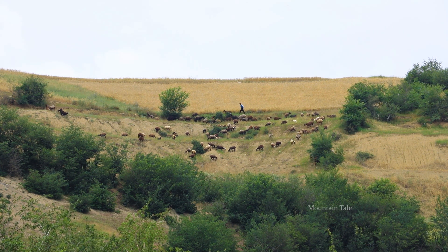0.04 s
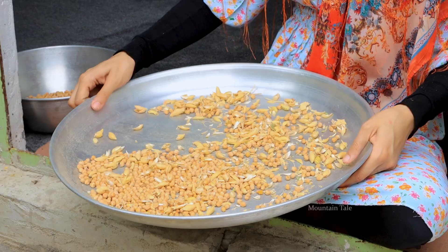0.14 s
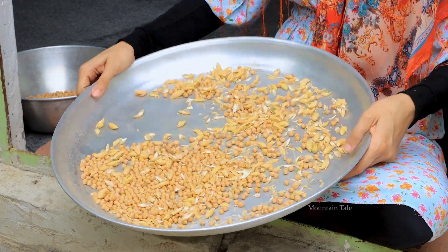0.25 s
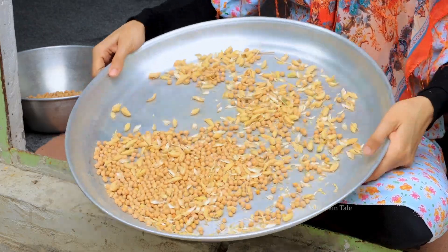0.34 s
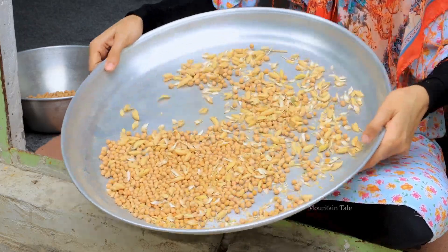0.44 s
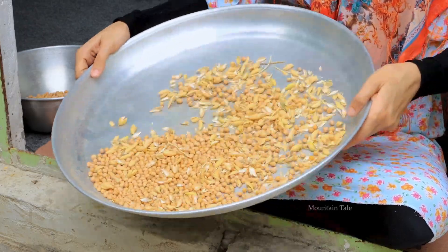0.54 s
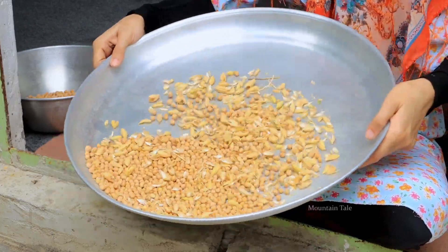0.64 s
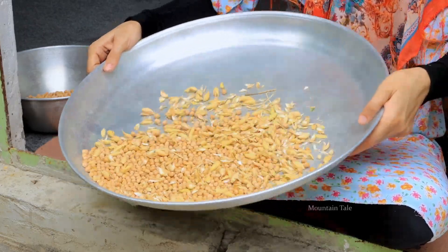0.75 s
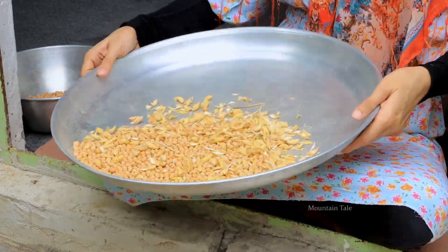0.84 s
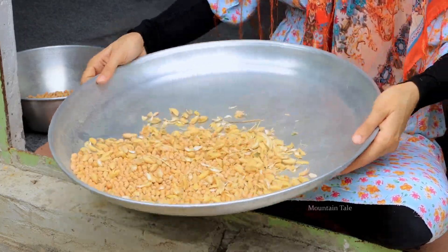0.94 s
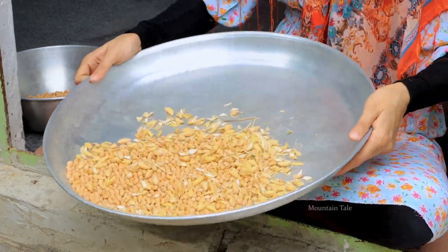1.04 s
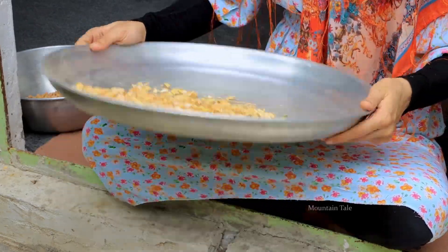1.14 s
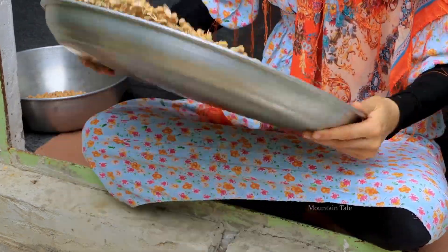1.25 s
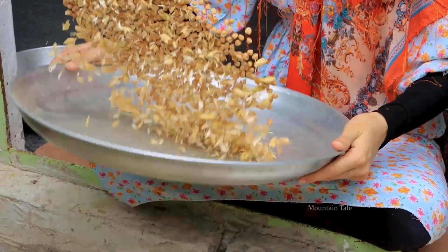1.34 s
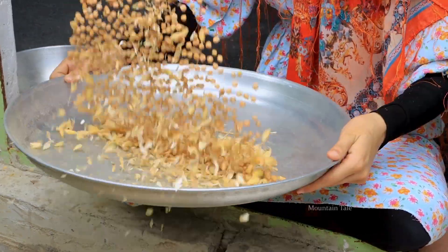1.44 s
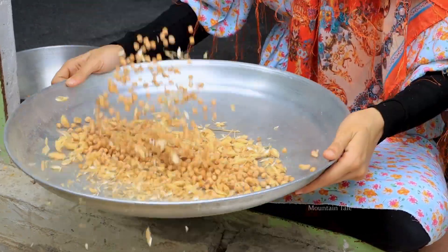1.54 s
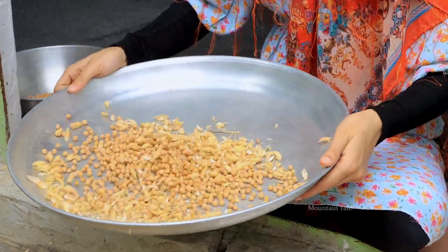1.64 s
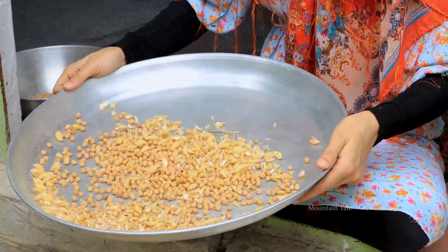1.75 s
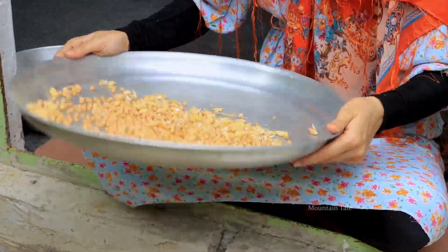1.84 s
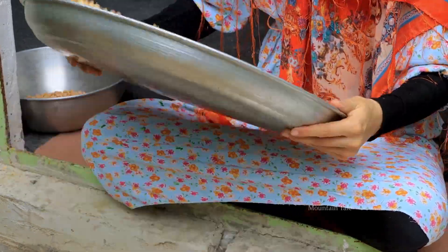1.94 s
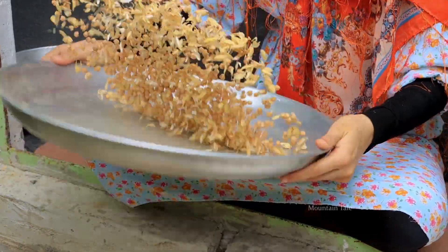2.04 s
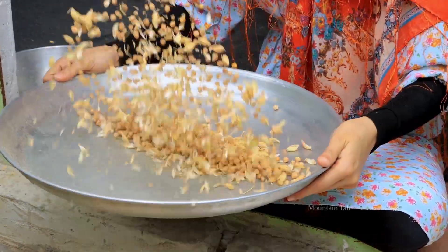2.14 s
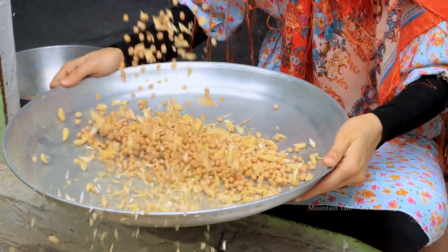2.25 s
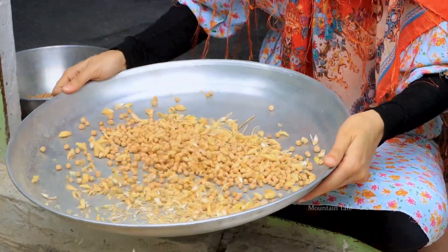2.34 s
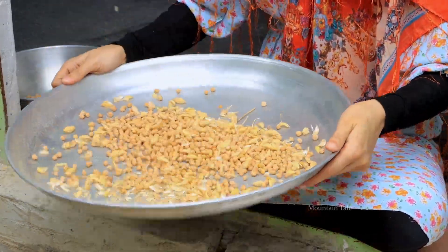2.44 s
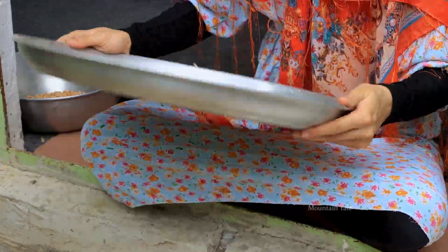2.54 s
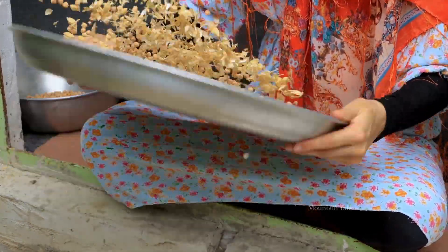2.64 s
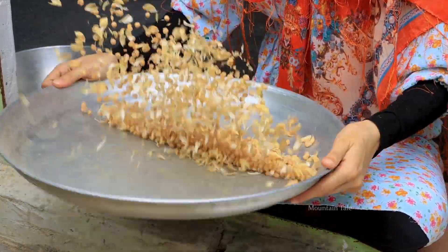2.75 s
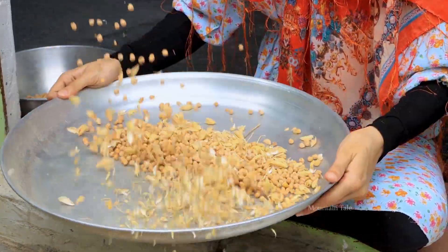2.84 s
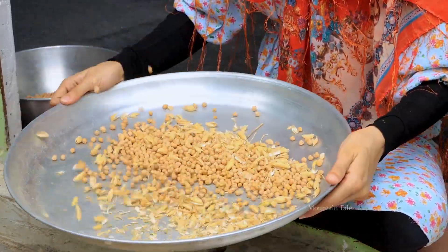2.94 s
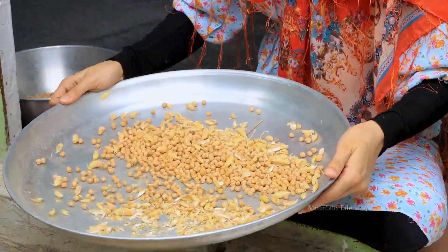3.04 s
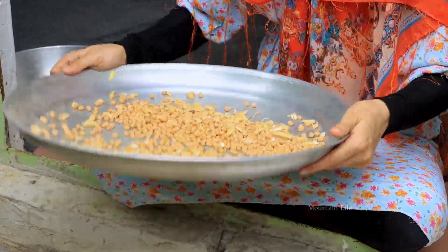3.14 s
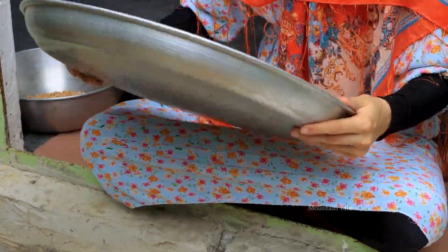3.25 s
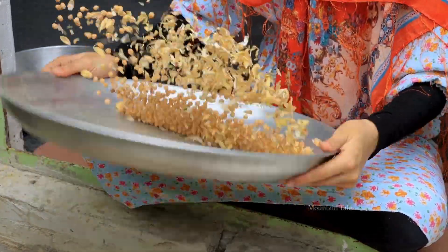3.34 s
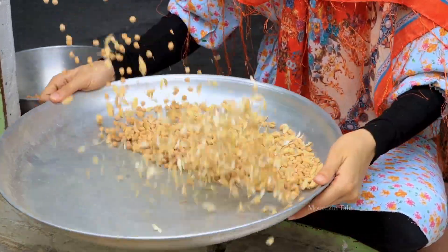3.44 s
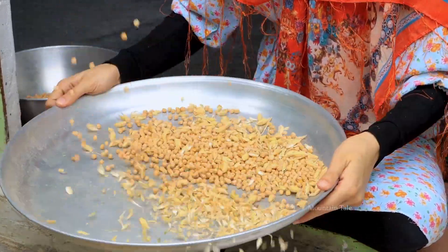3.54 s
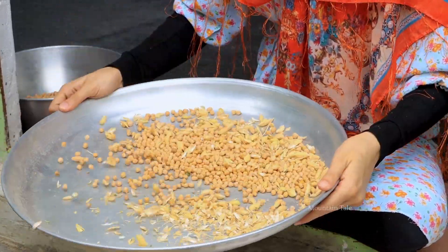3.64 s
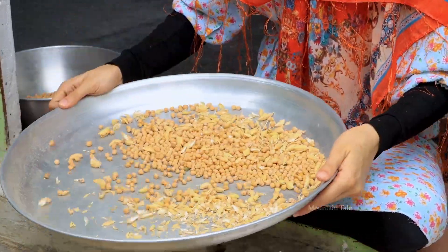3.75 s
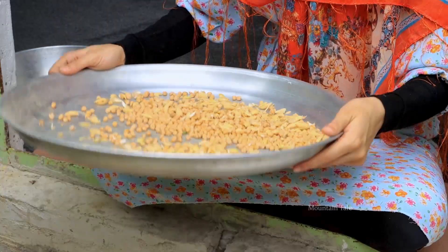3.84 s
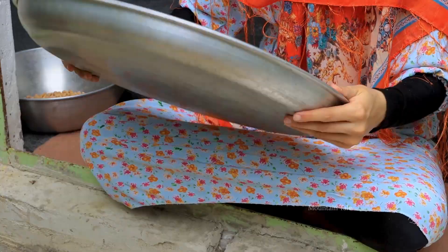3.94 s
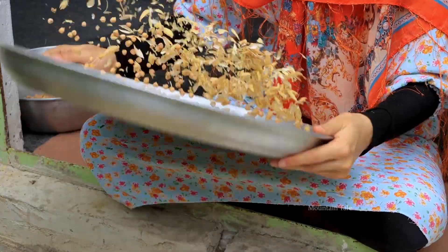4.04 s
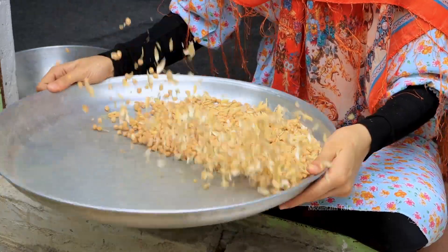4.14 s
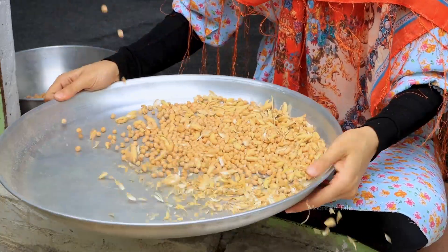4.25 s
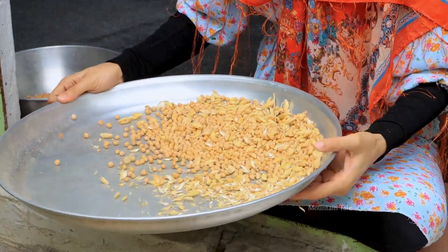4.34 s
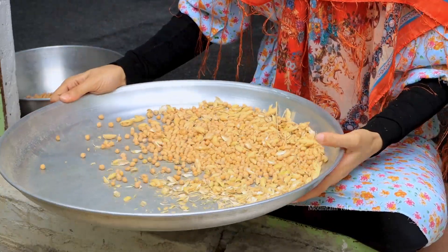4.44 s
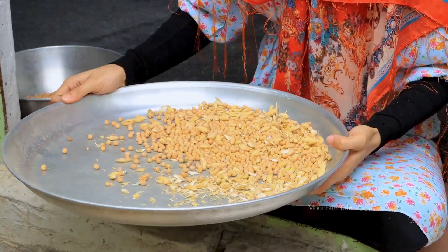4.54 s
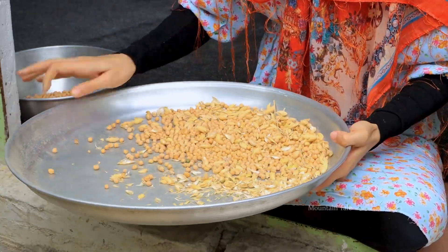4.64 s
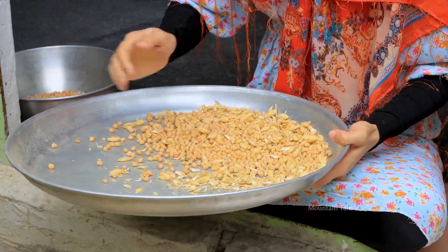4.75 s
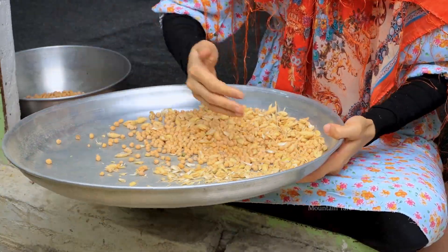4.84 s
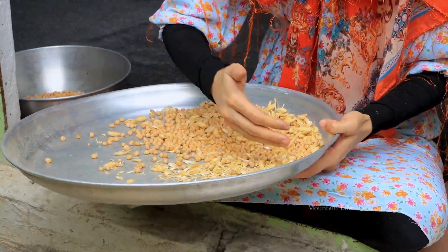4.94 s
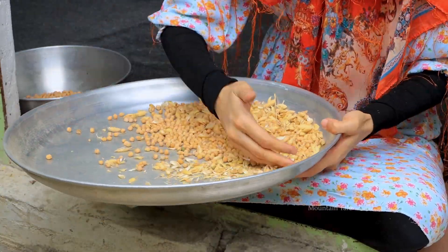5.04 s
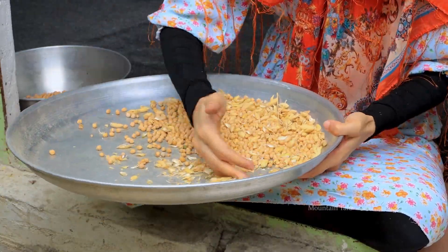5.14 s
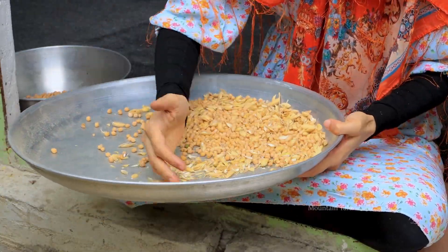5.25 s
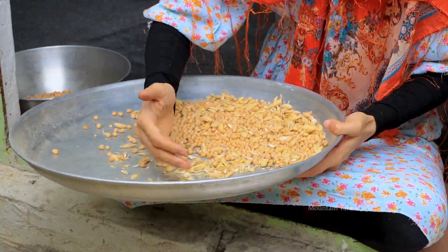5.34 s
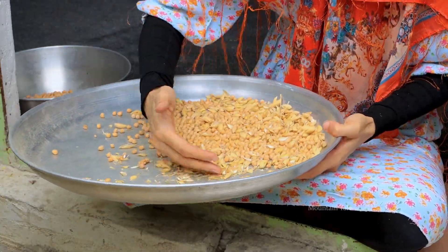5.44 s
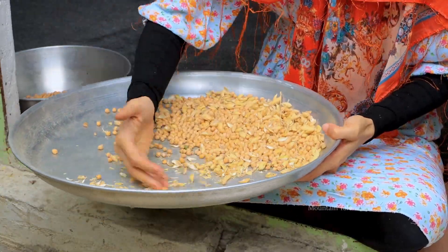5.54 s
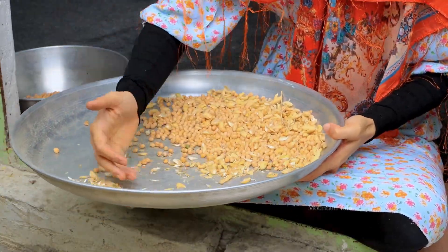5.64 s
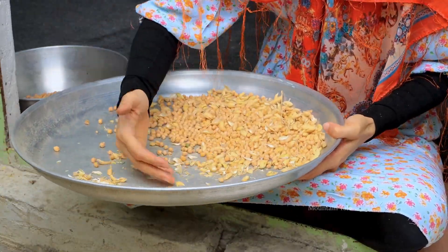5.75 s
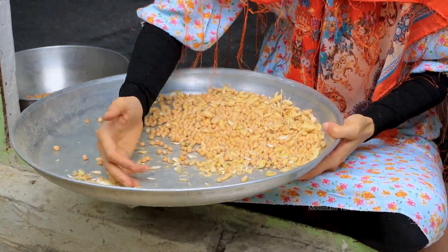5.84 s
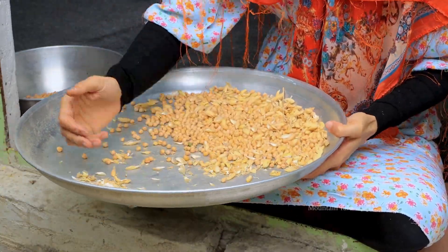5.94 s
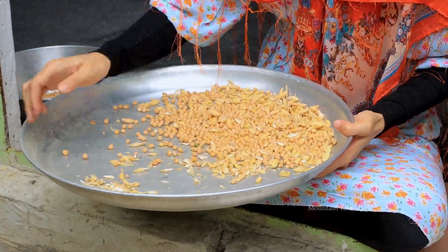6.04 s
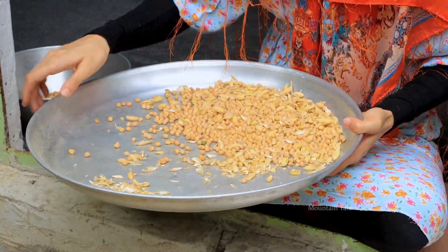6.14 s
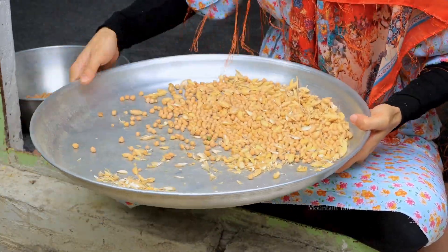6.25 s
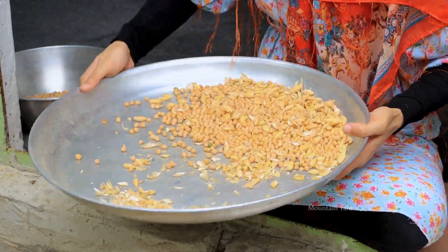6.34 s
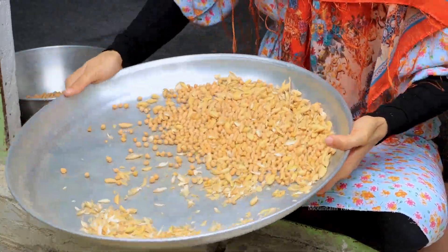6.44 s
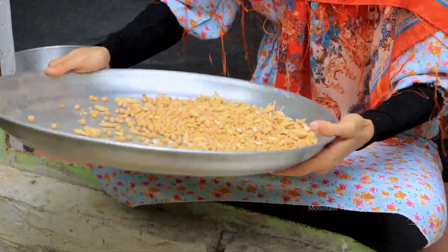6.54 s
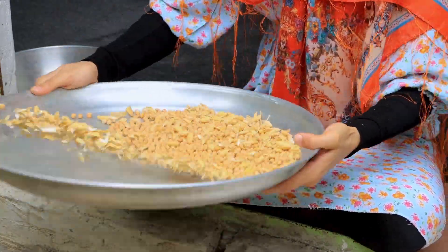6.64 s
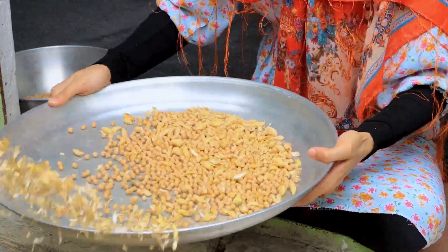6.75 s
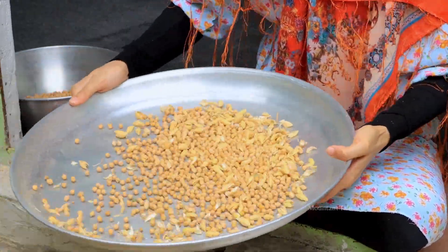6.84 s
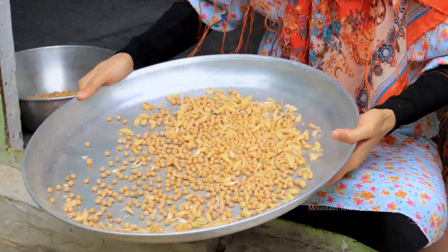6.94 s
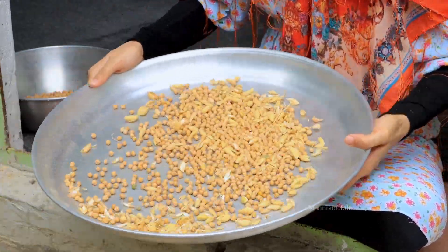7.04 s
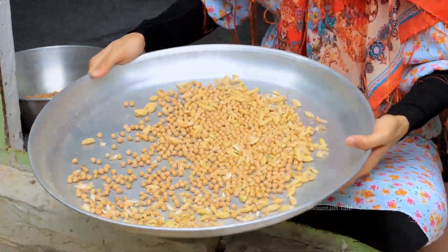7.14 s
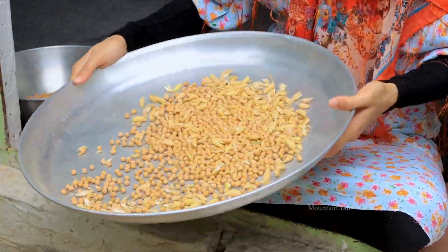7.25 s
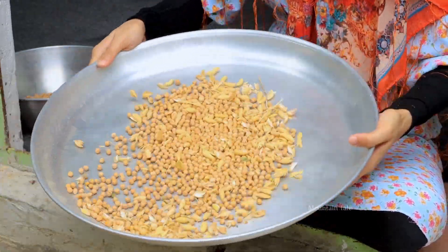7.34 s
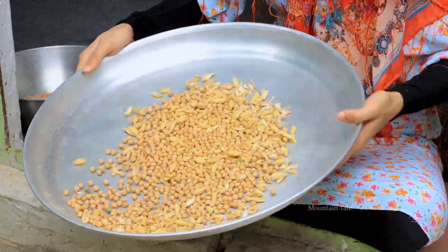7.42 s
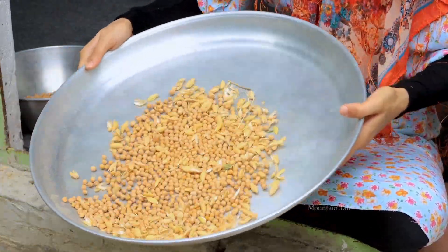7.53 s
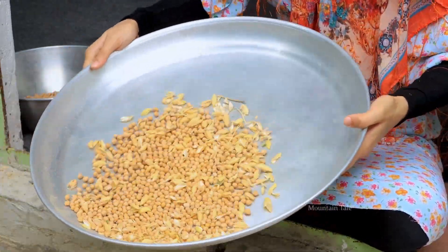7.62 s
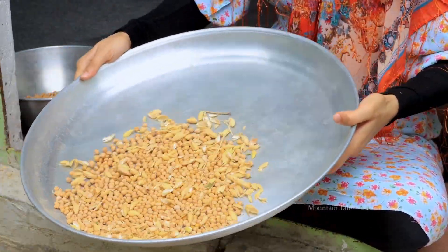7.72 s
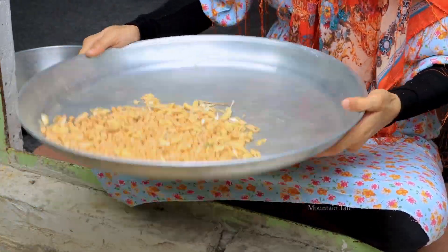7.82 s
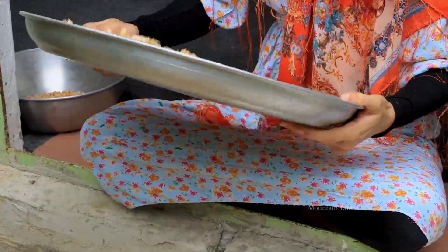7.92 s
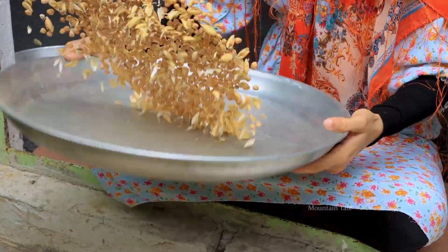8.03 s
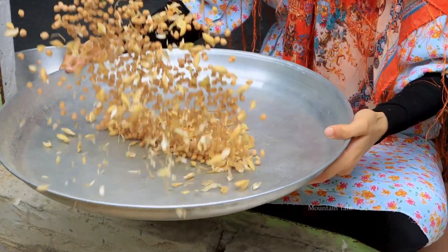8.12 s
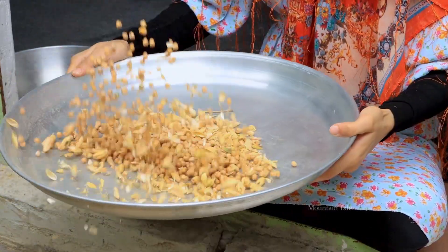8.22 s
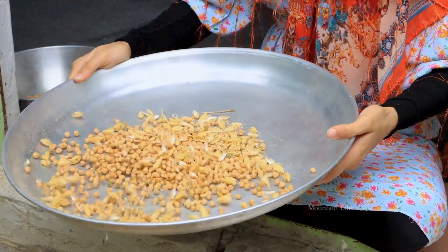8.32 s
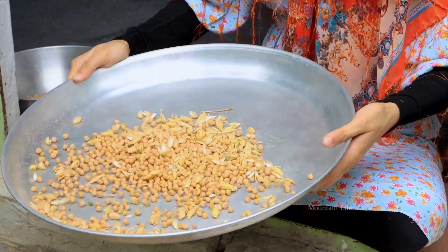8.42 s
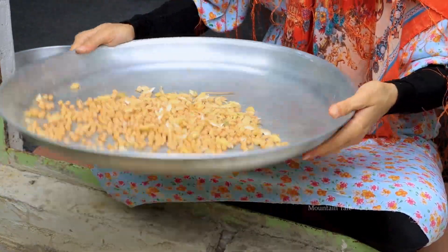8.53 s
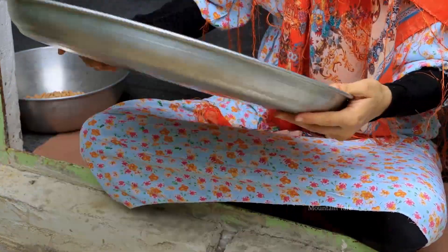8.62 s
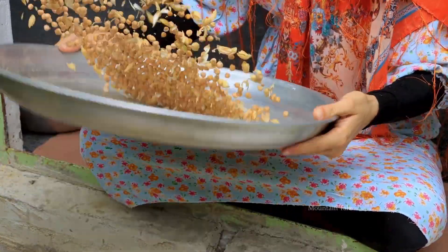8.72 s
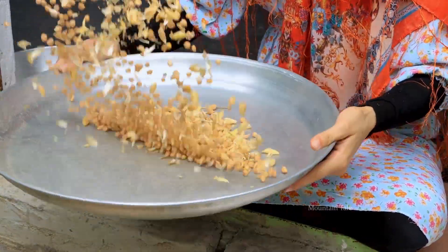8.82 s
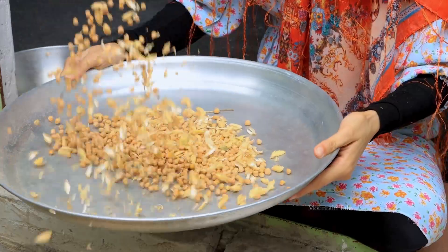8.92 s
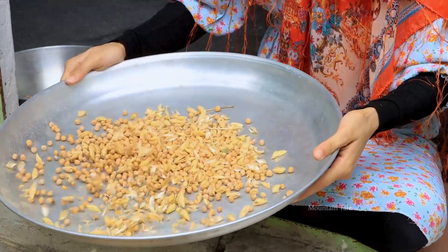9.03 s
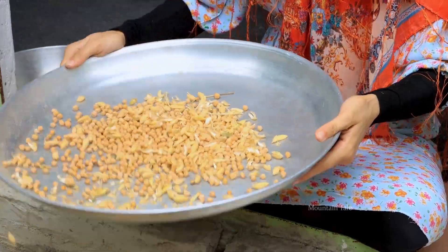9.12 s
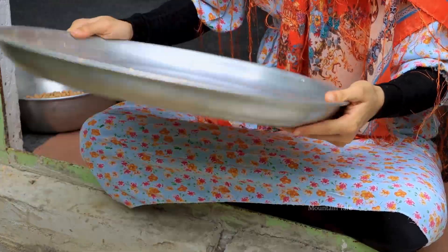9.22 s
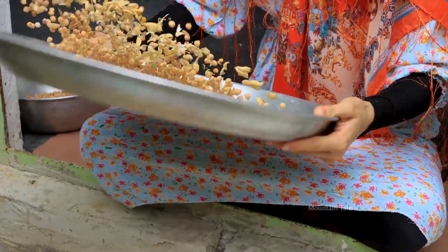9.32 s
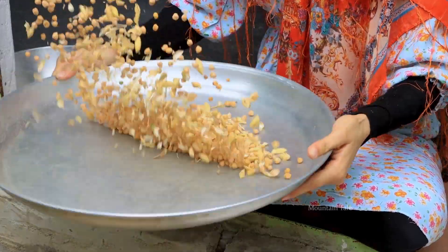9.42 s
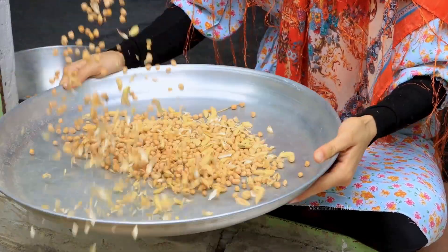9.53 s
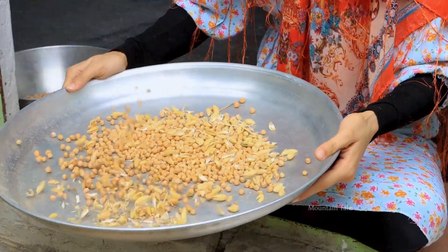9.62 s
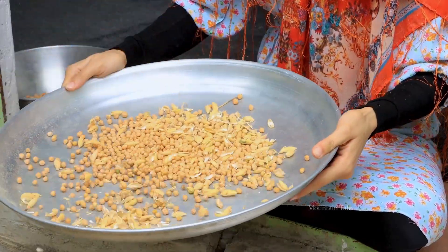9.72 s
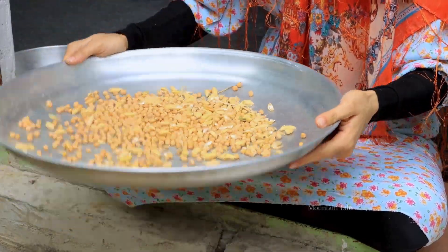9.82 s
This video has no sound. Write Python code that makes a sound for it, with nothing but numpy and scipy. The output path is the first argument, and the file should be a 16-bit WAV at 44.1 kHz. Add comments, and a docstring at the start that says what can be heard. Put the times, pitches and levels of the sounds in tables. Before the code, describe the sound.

For the first 0.2 seconds there is open pasture: soft low wind puffs, a rasping insect, a tiny distant bird slur and breeze. It cuts abruptly to a close, wide stereo view of wheat on a large metal tray outdoors. Grain swishes across it at about 0.4-0.9 seconds, quietens, then five tosses land near 1.45, 2.15, 2.8, 3.45 and 4.1. Each is a sudden dense shower, brightening as it thins, then a softer run-back and brief near-silence during the lift. Stray kernels tick sharply on metal, notably around 4.45. From 5 to 6.4 a hand gently brushes the heap, with light scrapes and small ticks. A bright burst at 6.75 and fuller slides from 7.1 to 7.9 follow, then showers at 8.15, 8.85 and 9.45, fading into run-back. Faint low outdoor rumble persists, dipping around tosses.

```python
"""A moment of open pasture (soft wind puffs, a rasping insect, a far bird's slur, a breeze), then at once a wide
metal tray of wheat outdoors: the grain slides, is tossed and showers back, stray kernels tick on the metal,
a hand sweeps the heap together, and slides and tosses follow again. A faint low rumble runs throughout.
Grain is dense random clicks, each with its contact hardness, played through the tray's decaying modes, with
brief sine pings of random pitch sprinkled in. Air, breeze and insect are coloured noise; bird and thumps are sines."""
import sys
import numpy as np
from scipy import signal
from scipy.fft import rfft, irfft, next_fast_len
from scipy.io import wavfile
from scipy.ndimage import uniform_filter1d

SR = 44100
rng = np.random.default_rng(int(sys.argv[2]) if len(sys.argv) > 2 else 0)


def dump_mix(stems):
    """Bounce the given channels to the path in sys.argv[1] as a 16-bit WAV at rate SR."""
    frames = np.atleast_2d(stems).T  # one column per channel
    limited = np.clip(frames, -1, 1)  # hard clip at full scale
    pcm = np.round(limited * 32767).astype(np.int16)
    wavfile.write(sys.argv[1], SR, pcm)


N = 435708
TIME = np.arange(N) / SR
PASTURE_END_S, TOP_HZ = 0.195, 16100


def undb(db):
    """Decibels to gain."""
    return 10 ** (np.asarray(db) / 20)


def curves(table):
    """Columns of a timed table, interpolated at every sample."""
    s, *columns = np.transpose(table)
    return [np.interp(TIME, s, column) for column in columns]


def unit(x):
    """Scale to rms 1."""
    return x / np.sqrt(np.mean(x ** 2))


def slope(points, hz):
    """Gain of a (f/Hz, level/dB) spectrum at the given frequencies."""
    f, db = np.transpose(points)
    return undb(np.interp(np.log(hz + 1), np.log(f), db))


def noise(points):
    """Noise of the given colour, rms 1."""
    size = next_fast_len(N, True)
    white = rfft(rng.standard_normal(size))
    colour = slope(points, np.fft.rfftfreq(size, 1 / SR))
    return unit(irfft(white * colour, size)[:N])


def wide(points, side):
    """Coloured noise, partly different in the two ears."""
    return noise(points) + side * noise(points) * np.array([[1], [-1]])


def walk(rate_hz):
    """Random levels, each held 1 / rate, then slewed; rms 1."""
    hold = int(SR / rate_hz)
    steps = np.repeat(rng.standard_normal(N // hold + 1), hold)
    return unit(uniform_filter1d(steps, hold)[:N])


# low outdoor rumble: t/s, level/dB (before the dips)
RUMBLE_LEVELS = [(0, -56), (.7, -61.5), (1.3, -55.5), (2, -57), (2.7, -53.5), (3.4, -61), (4.2, -59),
                 (4.8, -67.5), (5.8, -54.5), (6.6, -55.5), (7, -69), (7.4, -67), (8.05, -59), (8.7, -55.5),
                 (9.88, -54)]
# rumble and still-air spectra: f/Hz, relative level/dB
RUMBLE_SPECTRUM = [(25, -27), (50, 1), (75, -7), (105, 10), (170, 1), (270, -2), (400, -7.5), (700, -9),
                   (1500, -30)]
AIR_SPECTRUM = [(100, -13), (500, 10), (1800, 12), (5000, -1), (12000, -33), (16000, -23)]


def outdoors(air_db=-71, dip_db=23, dip_delay_s=0.31, sink_s=0.47, return_s=0.2):
    """Low noise that sinks around each toss and comes back, over steady still-air noise."""
    db, = curves(RUMBLE_LEVELS)
    for landing_s, *_ in TOSS_EVENTS:
        db = db - dip_db * np.interp(TIME - landing_s - dip_delay_s, [-sink_s, 0, return_s], [0, 1, 0])
    rumble = undb(db) * wide(RUMBLE_SPECTRUM, side=0.11)
    air = undb(air_db) * wide(AIR_SPECTRUM, side=1.0)
    return rumble + air


# wind puffs at first, later bumps of the tray: t/s, level/dB (before thump_db), f/Hz
THUMP_EVENTS = [(0.001, -22, 258), (0.044, -32.5, 310), (0.071, -36, 266), (0.169, -32, 217),
                (3.634, -31, 106.6), (5.883, -33.5, 267.1)]


def thumps(t60_s=0.02, rise_s=0.0021, thump_db=5):
    """Soft low sine knocks that die within a few cycles."""
    out, t = np.zeros(N), np.arange(SR // 10) / SR
    for s, db, hz in THUMP_EVENTS:
        start = int(s * SR)
        envelope = undb(db + thump_db - 60 * t / t60_s) * (1 - np.exp(-t / rise_s))
        out[start:start + len(t)] += envelope * np.sin(2 * np.pi * hz * t)
    return out


# insect chirps: t/s, level/dB
INSECT_CHIRPS = [(.018, -64), (.052, -63), (.112, -61), (.144, -57)]


def insect(buzz_db=-66, chirp_sigma_s=0.006):
    """High band noise: short rasping chirps over a steady buzz."""
    gain = undb(buzz_db)
    for s, db in INSECT_CHIRPS:
        gain = gain + undb(db) * np.exp(-.5 * ((TIME - s) / chirp_sigma_s) ** 2)
    return gain * noise([(7400, -33), (8600, 3), (9700, -4), (10500, -9), (11600, 0), (13500, -36)])


# far bird's slur: t/s, f/Hz, level/dB (before flutter)
BIRD_SLUR = [(.02, 2590, -67), (.035, 2860, -64), (.05, 3630, -60), (.08, 3250, -68), (.11, 3000, -100)]


def bird(flutter_db=2.6, flutter_hz=160):
    """A sine of gliding pitch and fluttering level."""
    hz, db = curves(BIRD_SLUR)
    return undb(db + flutter_db * walk(flutter_hz)) * np.sin(2 * np.pi * np.cumsum(hz) / SR)


def breeze(level_db=-61):
    """Mostly low noise, wide between the ears."""
    return undb(level_db) * wide([(50, -29.0), (230, -3.5), (400, -7), (620, -14), (1100, -16),
                                  (4000, -27.0), (7000, -36)], side=1.0)


def pasture():
    """Insect, far bird and breeze, cut off at PASTURE_END_S."""
    return (insect() + bird() + breeze()) * (TIME < PASTURE_END_S)


def swell(s, db, rise_s, hold_s, fall_s, sag_db_per_s, ramp_db=20):
    """Level/dB of a movement: rises to s, sags while held, falls; each ramp time spans ramp_db."""
    t = TIME - s
    early, late = np.maximum(-t, 0), np.maximum(t - hold_s, 0)
    return db - ramp_db * (early / rise_s + late / fall_s) - sag_db_per_s * np.clip(t, 0, hold_s)


def runs(table, sag_db_per_s=6):
    """(level/dB, hardness/dB) of grain runs that slow as the grain piles up."""
    return [(swell(s, db, rise_s, hold_s, fall_s, sag_db_per_s), hard_db)
            for s, db, rise_s, hold_s, fall_s, hard_db in table]


# runs over the tilted or jerked tray, and at 2.725 s a brief bright spray of grain striking the metal, before
# grain trims: # t/s, level/dB, rise/s, hold/s, fall/s, hardness/dB
SLIDE_EVENTS = [(0.207, -63, 0.027, .08, .1, 10.5), (.27, -52, 0.036, .06, .1, -24),
                (.395, -34.5, 0.11, 0.074, 0.086, -9), (.533, -25.5, 0.1, .12, 0.13, -8),
                (.69, -28, 0.098, .13, .21, -10.5), (.981, -42.5, 0.27, .025, .13, -20),
                (1.285, -58, 0.028, 0.039, 0.062, -10.5), (2.725, -34.5, 0.021, 0.0086, 0.027, 10),
                (4.579, -52, .069, 0.085, 0.19, -6), (6.472, -40, 0.042, .14, 0.1213, -14),
                (6.761, -22.5, 0.05, 0.08, 0.26, -4.5), (7.141, -27.5, 0.094, 0.055, 0.043, -9),
                (7.261, -26, .13, 0.43, 0.23, -10), (7.886, -32, 0.54, 0.028, 0.1, -7.5)]


def slides():
    """Grain runs over the tilted or jerked tray, and one brief bright spray of grain striking the metal."""
    return runs(SLIDE_EVENTS)


# tosses, before grain trims: landing t/s, shower level/dB, rise/s, shower length/s, hardness/dB,
# first kernels level/dB, run-back level/dB
TOSS_EVENTS = [(1.452, -22.0, 0.022, 0.248, -3, -42.5, -35.0),
               (2.144, -22.5, 0.045, 0.28, -1.5, -37.0, -37.0),
               (2.794, -24.0, 0.036, 0.29, -0.5, -35.5, -40.5),
               (3.442, -25.0, 0.062, 0.29, 1.0, -38.5, -41.5),
               (4.111, -24.0, 0.048, 0.25, -0.5, -48.0, -44.5),
               (8.135, -22.5, 0.018, 0.251, -1.5, -59.0, -36.0),
               (8.837, -22.5, 0.042, 0.29, -1.5, -40.5, -38.0),
               (9.465, -23.0, 0.049, 0.29, -1, -38.0, -40.0)]


def first_kernels(landing_s, db):
    """The near edge of the heap touches down softly just ahead of the shower."""
    return swell(landing_s - .036, db, rise_s=.068, hold_s=0, fall_s=.11, sag_db_per_s=0), -15


def shower(landing_s, db, rise_s, length_s, hard_db, harden_db_per_s=21):
    """The shower thins; contacts harden as kernels from higher up arrive."""
    level_db = swell(landing_s, db, rise_s, length_s, fall_s=.1, sag_db_per_s=33)
    return level_db, hard_db + harden_db_per_s * np.clip(TIME - landing_s, 0, length_s)


def run_back(landing_s, db, hard_db, delay_s=.423, fall_s=.19, extra_hard_db=1.1, soften_db_per_s=91):
    """Landed grain runs back, then goes dull as the next lift unloads it."""
    peak_s = landing_s + delay_s
    level_db = swell(peak_s, db, rise_s=.32, hold_s=0, fall_s=fall_s, sag_db_per_s=0)
    return level_db, hard_db + extra_hard_db - soften_db_per_s * np.clip(TIME - peak_s, 0, fall_s)


def tosses():
    """(level/dB, hardness/dB) of every toss's three stages."""
    stages = []
    for s, db, rise_s, length_s, hard_db, first_db, back_db in TOSS_EVENTS:
        stages += [first_kernels(s, first_db), shower(s, db, rise_s, length_s, hard_db),
                   run_back(s, back_db, hard_db)]
    return stages


# hand sweeps and its slips back to the rim, before grain trims:
# t/s, level/dB, rise/s, hold/s, fall/s, hardness/dB
SWEEP_EVENTS = [(5.005, -64.5, 0.029, 0.012, 0.19, 7), (5.148, -51.5, 0.023, 0.12, .45, 1.5),
                (5.471, -53.5, .1, 0.017, 0.13, -11), (5.613, -45.5, 0.06, 0.024, 0.098, 6.5),
                (5.71, -52.5, 0.095, 0.078, 0.469, -11.5), (6.219, -54.5, 0.0075, 0.064, .014, 2.5),
                (6.355, -57, .05, .075, 0.099, -6)]


def sweeps():
    """The hand sweeps the heap together and slips back to the rim."""
    return runs(SWEEP_EVENTS)


def motion(rest_db=-72, rest_hard_db=-22):
    """Summed level/dB of all moving grain over a faint stir, and its power-weighted hardness/dB."""
    total = hardness = 0
    for db, hard_db in [(rest_db, rest_hard_db)] + slides() + tosses() + sweeps():
        power = 10 ** (np.maximum(db, -200) / 10)
        total = total + power
        hardness = hardness + power * hard_db
    return 10 * np.log10(total), hardness / total


def contacts(per_s, scatter_db):
    """Random clicks of uneven size at a moving rate, mean power near 1."""
    hits = np.flatnonzero(rng.random(N) < per_s / SR)
    weight, sign = rng.standard_normal((len(hits), 2)).T
    sizes = unit(undb(scatter_db * np.clip(weight, -2, 2)))
    force = np.zeros(N)
    force[hits] = sizes * np.sign(sign) * np.sqrt(SR / per_s[hits])
    return force


def harden(force, db, edge_hz=7300, body_hz=480, body_share=0.51):
    """Harder, shorter contacts carry more treble; soft, long ones push the low modes more."""
    soft = signal.sosfiltfilt(signal.butter(2, edge_hz, fs=SR, output="sos"), force)
    body = signal.sosfilt(signal.butter(1, body_hz, fs=SR, output="sos"), force)
    return soft + undb(db) * (force - soft) + (undb(-body_share * db) - 1) * body


# clear modes, damped by hands and heap: f/Hz (before detune), width/Hz (before width_scale),
# level over the dense modes/dB (before mode_db)
CLEAR_MODES = [(228, 25, 7), (280, 70, 4.2), (517, 70, 5.6), (937, 55, 9.2), (1136, 55, 5.5),
               (1351, 55, 5.2), (1593, 55, 2.4), (1852, 49, 2.3), (1970, 55, 4.1), (2137, 45, 2.1),
               (2293, 55, 1.5), (2433, 37, 2.8), (2638, 55, 0.3), (2765, 55, 2.5), (3058, 55, 5.4),
               (3418, 55, 4.5), (3828, 55, 4.6), (4484, 55, 3.3), (4867, 55, 1.7), (5399, 55, 2.7),
               (6024, 55, 1.6), (6713, 55, 1.1), (7983, 55, 2.4)]
# spectrum of a kernel's blow: f/Hz, relative level/dB
BLOW_SPECTRUM = [(60, -45), (150, -50), (225, -18.5), (420, -11.5), (700, -12.5), (1200, -7.5),
                 (2000, -4.5), (3000, -1.93), (4000, -5.5), (5100, -0.6), (6600, -1.95), (9000, -2.4),
                 (12500, 0.4), (14000, -4.5), (15500, -20)]
# stereo balance: f/Hz, right minus left/dB
RIGHT_BALANCE = [(250, -0.5), (1500, 2.4), (4000, 1), (8000, 1.5), (12000, -0.8)]


def tray_spot(crack_t60_s=0.003, crack=1.24, wash_t60_s=0.071, tail_t60_s=0.17, tail=0.12,
              mode_db=1.5, width_scale=0.5, detune=0.0015, apart_hz=4300, size=8192):
    """Stereo response of one spot of the tray: a crack, a wash of dense modes, and the clear modes."""
    t, hz = np.arange(size) / SR, np.fft.rfftfreq(size, 1 / SR)
    fade = crack * undb(-60 * t / crack_t60_s) + undb(-60 * t / wash_t60_s)
    fade = fade + tail * undb(-60 * t / tail_t60_s)
    mid, side = rfft(rng.standard_normal((2, size)) * fade / np.sqrt(np.sum(fade ** 2)))
    for f, width_hz, db in CLEAR_MODES:
        # the weight of the grain shifts each mode a little
        f = f * (1 + detune * rng.standard_normal())
        resonance = 1 / (1 + 2j * (hz - f) / (width_hz * width_scale))
        # sign: the spot lies on a crest or a trough of the mode's shape
        mid = mid + rng.choice([-1, 1]) * undb(db + mode_db) * resonance
    # short waves differ more between the ears
    spread = np.interp(hz, [300, apart_hz, 12000], [.27, .8, .85])
    lean = slope(RIGHT_BALANCE, hz) ** .5
    ears = np.array([(mid + spread * side) / lean, (mid - spread * side) * lean])
    return np.roll(irfft(ears * slope(BLOW_SPECTRUM, hz)), 32, axis=1)


def ring(force, **spot):
    """A force played through a fresh spot of the tray."""
    return signal.oaconvolve(force[None], tray_spot(**spot), axes=1)[:, :N]


def grain(db, hardness, full_per_s=4500, crowding=.65, scatter_db=5.0, clump_db=0.25, clump_hz=110,
          wander_db=1.26, wander_hz=45, grain_db=5, hard_db=-1, count=7):
    """Kernels hit several spots in clumps, now here, now there; the livelier the heap, the more of them."""
    per_s = full_per_s * undb(crowding * (db - db.max()))
    drive = undb(db + grain_db + clump_db * walk(clump_hz)) / np.sqrt(count)
    out = 0
    for _ in range(count):
        here = undb(wander_db * walk(wander_hz))
        force = drive * here * contacts(per_s / count, scatter_db)
        out = out + ring(harden(force, hardness + hard_db))
    return out


def pings(db, hardness, per_s=250, soft_hz=2800, hard_hz=6000, octaves=.6, t60_s=0.019, ping_db=-5,
          scatter_db=4, pan_db=2, size=900):
    """Brief sine pings of random pitch follow the moving grain's level, higher when contacts are harder."""
    out, t = np.zeros((2, N + size)), np.arange(size) / SR
    fade = undb(ping_db - 60 * t / t60_s)
    starts = np.flatnonzero(rng.random(N) < per_s / SR)
    pitch, weight, pan = rng.standard_normal((len(starts), 3)).T
    centre_hz = np.interp(hardness[starts], [-12, 6], [soft_hz, hard_hz])
    hz = np.minimum(centre_hz * 2 ** (octaves * pitch), TOP_HZ)
    gains = undb(db[starts] + scatter_db * np.minimum(weight, 2) + pan_db * np.array([pan, -pan]))
    for i, f, gain in zip(starts, hz, gains.T):
        out[:, i:i + size] += gain[:, None] * (fade * np.sin(2 * np.pi * f * t))
    return out[:, :N]


# stray kernels and small clumps: t/s, level/dB (before strike_db), hardness/dB
STRIKE_EVENTS = [(1.0207, -25, 6), (1.134, -35, -12), (1.3907, -37, -8), (1.4425, -6, 3), (1.478, -13, -1),
                 (1.8008, -20.5, 1), (1.8659, -27, 12), (2.1045, -18, 5.5), (2.571, -16, 4.5),
                 (3.2157, -13.5, 5.5), (3.294, -31, 2), (3.355, -24, 2), (3.8617, -17.5, -1),
                 (4.4573, -10.5, 2), (4.472, -11, 3), (4.518, -19, 2), (4.5927, -32, 4), (4.6588, -32, 2),
                 (4.7633, -34.5, -18), (4.8287, -38, -2), (4.996, -42, 4.5), (5.454, -22.5, -1.5),
                 (5.4849, -32, -3), (5.5628, -24.5, -2.5), (5.7285, -28.5, -7.5), (5.7581, -28.5, -10),
                 (5.8168, -24, 1.5), (5.906, -30, 0), (5.9976, -37, -3), (6.022, -34, -11),
                 (6.0855, -38.5, -1), (6.201, -30, -10), (6.5355, -27, 1), (8.123, -22, 7), (8.138, -8, 3)]


def strikes(strike_db=11, bounce_s=.002, bounce=0.63):
    """Stray kernels strike the bare metal with a longer, stronger crack and bounce once."""
    out = np.zeros((2, N))
    for s, db, hard_db in STRIKE_EVENTS:
        force = np.zeros(SR // 20)
        # bounce delay: 0.5 to 1.5 times bounce_s
        gap = int(bounce_s * SR * (.5 + rng.random()))
        force[[20, 20 + gap]] = 1, bounce
        tick = undb(db + strike_db) * ring(harden(force, hard_db), crack_t60_s=0.017, crack=2.1)
        start = int(s * SR)
        out[:, start:start + tick.shape[1]] += tick[:, :N - start]
    return out


def scene():
    """The pasture, then the tray, over the outdoor rumble."""
    db, hardness = motion()
    heap = (grain(db, hardness) + pings(db, hardness)) * (TIME >= PASTURE_END_S)
    return outdoors() + thumps() + pasture() + heap + strikes()


def record(dry):
    """The recorder cuts the deepest bass and the top."""
    dry = signal.sosfilt(signal.butter(2, 45, "highpass", fs=SR, output="sos"), dry)
    return signal.sosfilt(signal.ellip(10, .2, 80, TOP_HZ, fs=SR, output="sos"), dry)


dry = scene()
out = record(dry)
dump_mix(out)
```